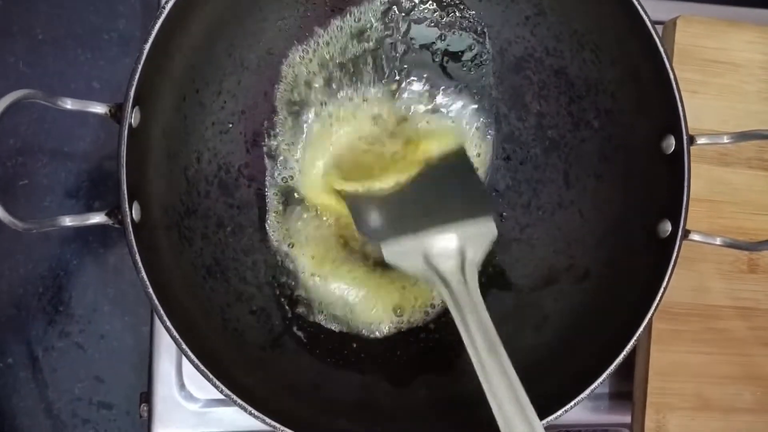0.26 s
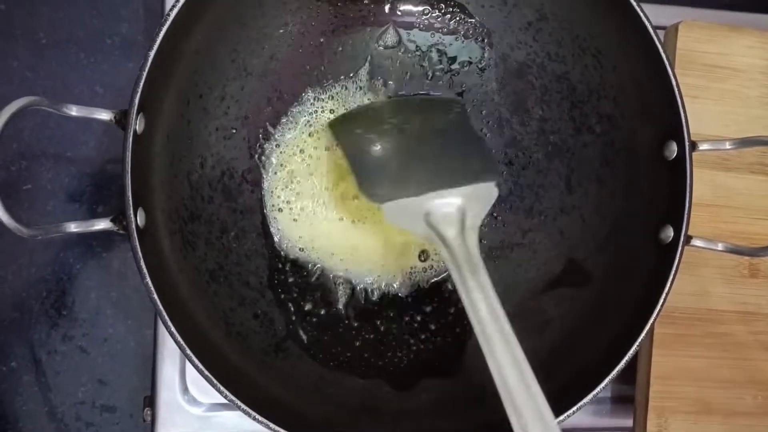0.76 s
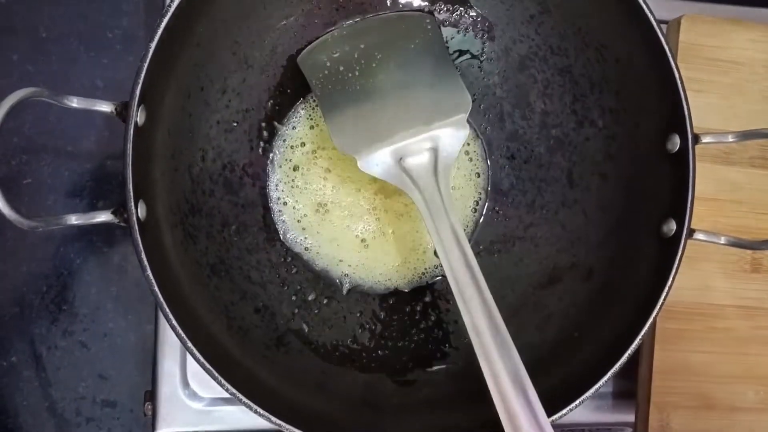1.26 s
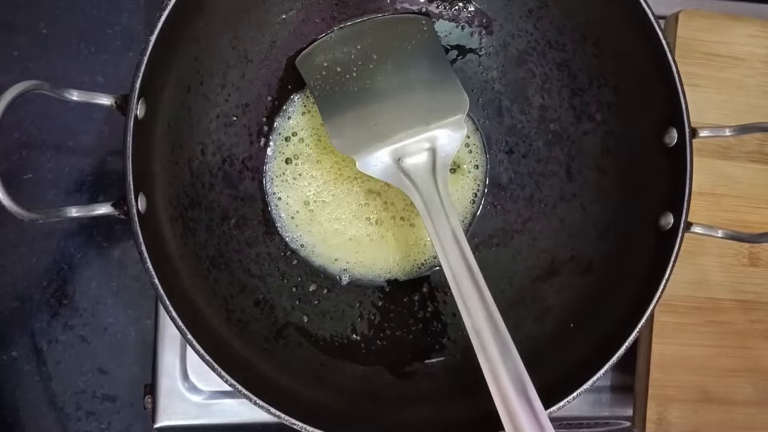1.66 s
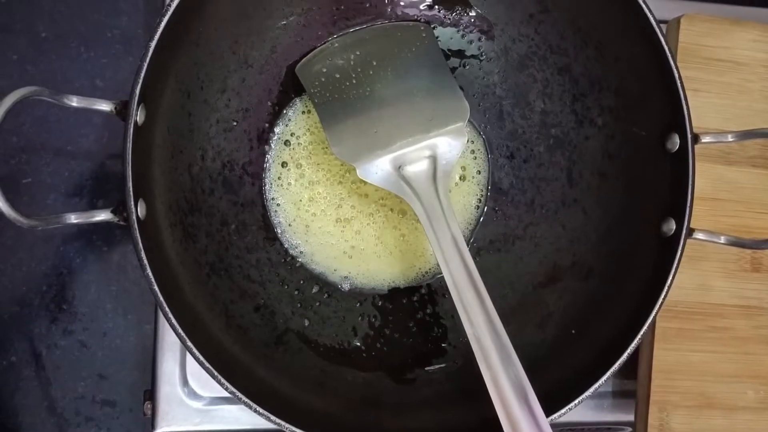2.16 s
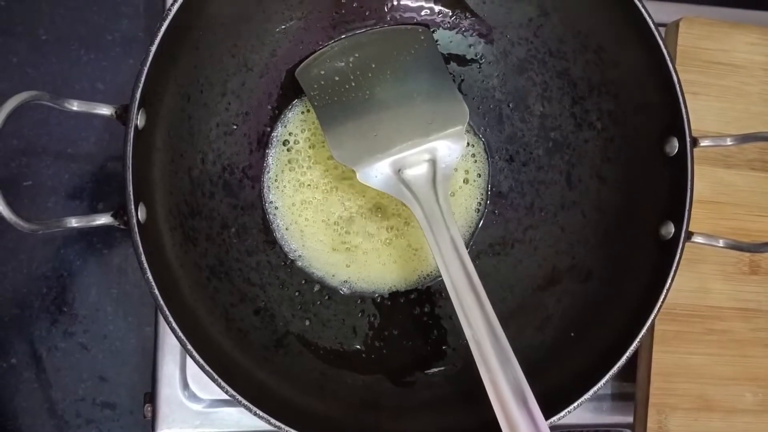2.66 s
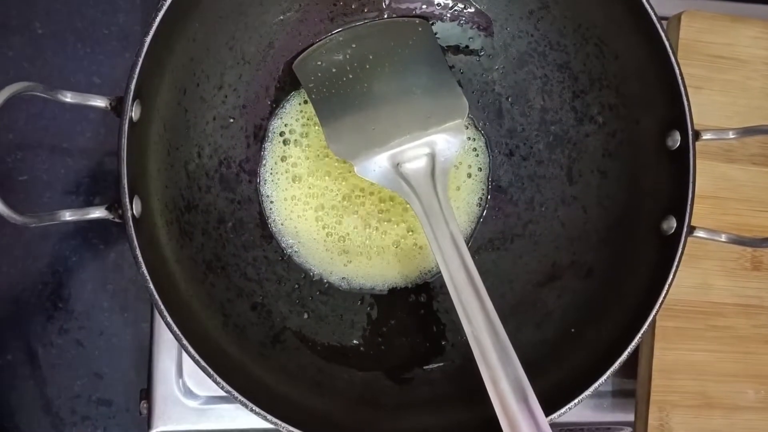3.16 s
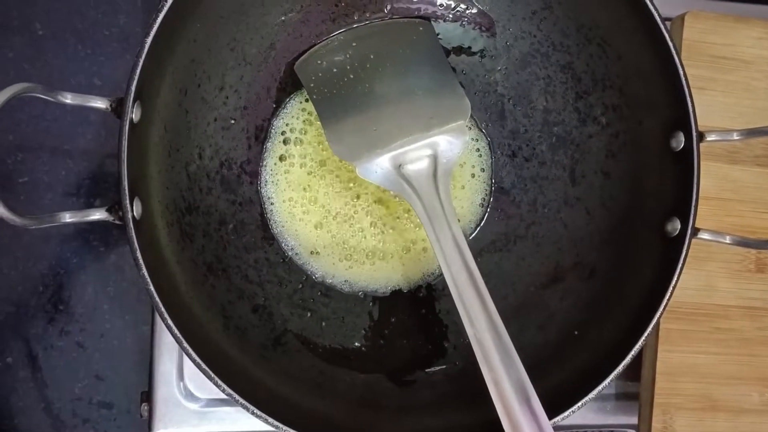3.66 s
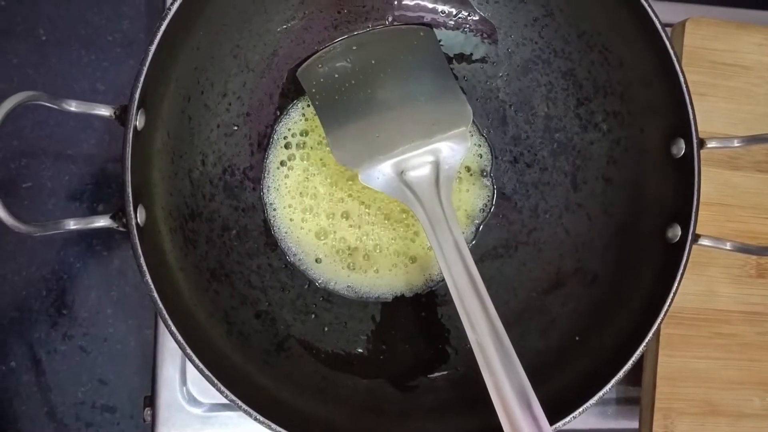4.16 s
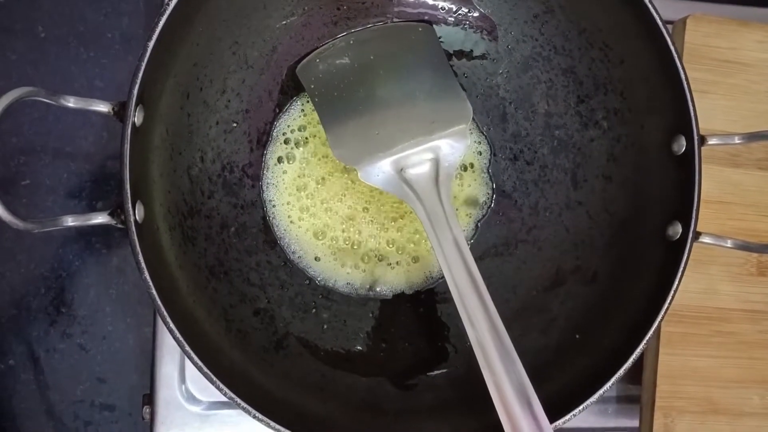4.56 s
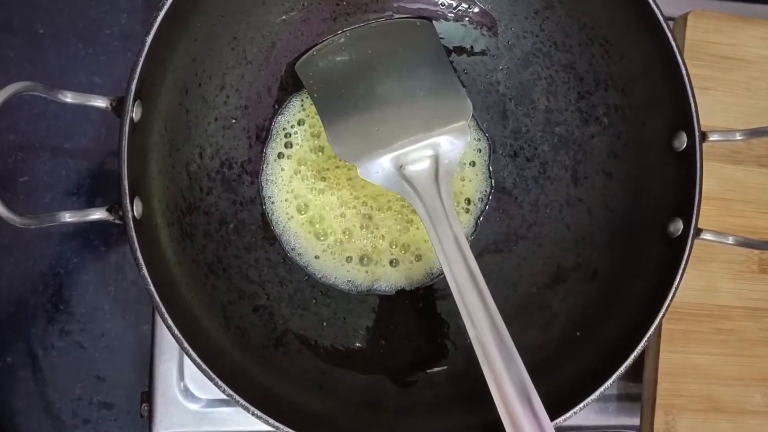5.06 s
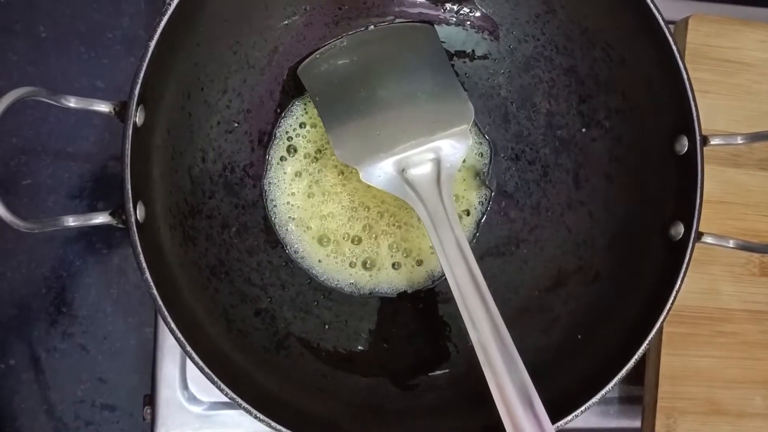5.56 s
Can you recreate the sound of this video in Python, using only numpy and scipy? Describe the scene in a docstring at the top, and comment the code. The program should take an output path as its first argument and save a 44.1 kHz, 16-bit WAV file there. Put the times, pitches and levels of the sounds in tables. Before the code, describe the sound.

Hot fat in a steel wok crackles with dense, bright, ringing pops over a faint sizzle, with a few gritty metal spatula knocks early on.

```python
"""Seeds pop in foaming hot fat in a steel wok, heard from close above at two microphone ports in a hard kitchen.
Each pop is a few ringing cycles with a bright noise snap; the biggest throw puffs of air, pressure jumps
that overload the ports. Early on a steel spatula knocks: gritty chatter rings damped steel modes.
Sizzle and burner rumble are coloured noise, and noise echoes let the kitchen answer pops and knocks."""
import sys
import numpy as np
from scipy import signal
from scipy.fft import rfft, irfft
from scipy.io import wavfile

SR = 44100
rng = np.random.default_rng(int(sys.argv[2]) if len(sys.argv) > 2 else 0)


def bounce(signal):
    """Save signal as a 16-bit WAV file at the path given by the first command-line argument."""
    frames = np.transpose(np.atleast_2d(signal))
    limited = np.clip(frames, -1, 1)
    pcm = np.round(limited * 32767).astype(np.int16)
    wavfile.write(sys.argv[1], SR, pcm)


N = 255780

# pitches that the foam and the wok favour: (frequency [Hz], relative spread [1])
HOLLOWS = [(1790, 0.069), (3050, 0.14)]


def amp(db):
    """Turns decibels into a linear gain."""
    return 10 ** (np.asarray(db, float) / 20)


def rms_one(x):
    """Scales a signal to an rms of 1."""
    return x / np.sqrt(np.mean(x ** 2) + 1e-20)


def in_time(rows):
    """Draws each column of a timed table as a curve over the whole scene."""
    s, *columns = np.transpose(rows)
    return [np.interp(np.arange(N) / SR, s, c) for c in columns]


def at_hz(points, hz, column=1):
    """Reads a table column at any frequency, along a logarithmic frequency axis."""
    table = np.array(points)
    return np.interp(np.log(hz), np.log(table[:, 0]), table[:, column])


def band(x, low_hz, high_hz):
    """Passes one band of frequencies."""
    sos = signal.butter(2, [low_hz, min(high_hz, .45 * SR)], "band", fs=SR, output="sos")
    return signal.sosfilt(sos, x)


def resonance(x, hz, width_hz):
    """A single resonant peak, driven by x."""
    r, w = np.exp(-np.pi * width_hz / SR), 2 * np.pi * hz / SR
    return signal.lfilter((1 - r * r) / 2 * np.array([1, 0, -1]), [1, -2 * r * np.cos(w), r * r], x)


def coloured(spectrum, alike):
    """Stereo noise of a given spectrum and left-right likeness; rms 1."""
    mid, side = rng.standard_normal((2, N))
    pair = np.sqrt(1 + alike) * mid + np.sqrt(1 - alike) * side * [[1], [-1]]
    hz = np.maximum(np.arange(N // 2 + 1) * SR / N, 10)
    slope_db = 12 * np.log2(np.minimum(hz / spectrum[0][0], 1))  # falls away below the first point
    return rms_one(irfft(rfft(pair) * amp(at_hz(spectrum, hz) + slope_db), N))


def shaped(envelope, wave):
    """Grains whose energy is that of their envelope, whatever chance put into the wave."""
    grain = envelope * wave
    wanted = np.sum(envelope ** 2, -1, keepdims=True)
    return grain * np.sqrt(wanted / np.sum(grain ** 2, -1, keepdims=True))


def add(out, s, grains):
    """Lays grains (channel, event, sample) into out at the times s."""
    at = np.round(np.asarray(s) * SR).astype(int)[:, None] + np.arange(grains.shape[-1])
    for channel in (0, 1):
        np.add.at(out[channel], np.minimum(at, N - 1), grains[channel])


def pops(s, hz, ring_db, snap_db):
    """A bursting bubble rings a few cycles, at each port a little otherwise; the tearing shell adds a bright snap."""
    ring_cycles = 2.7  # cycles in which a ring falls to 1/e
    right_lag_s = .0001  # the right port lies a little farther from the fat
    ring_left_db = 5  # rings are on average this much louder at the left port
    t = np.arange(400) / SR
    # per port and pop: four chance values, then 400 samples of noise
    chance = rng.standard_normal((len(s), 2, 404)).swapaxes(0, 1)
    detune, phase, other_luck = chance[..., :1], chance[..., 1:2], chance[:1, :, 2:3]
    balance_db = np.array([[.5], [-.5]]) * (ring_left_db + 3 * chance[0, :, 3])

    late = t - np.array([0, right_lag_s])[:, None, None]
    swell = (1 - np.exp(-(t / 0.00032) ** 2)) * np.exp(-t * hz[:, None] / ring_cycles)
    tone = np.sin(2 * np.pi * hz[:, None] * (1 + 0.041 * detune) * late + 0.81 * phase)
    # the other hollow sounds along, usually more faintly, and a little noise roughens the ring
    other_hz = np.where(hz > 2400, HOLLOWS[0][0], HOLLOWS[1][0])[:, None]
    tone += amp(-8 + 4 * other_luck) * np.sin(2 * np.pi * other_hz * late)
    tone += 0.36 * rms_one(band(chance[..., 4:], 1860, 4620))
    rings, cracks, drops = np.zeros((3, 2, N))
    add(rings, s, amp(ring_db + balance_db)[..., None] * shaped(swell, tone))

    # a sharp crack, then spattering droplets, both from the same noise played backwards
    tear = 1 - np.exp(-t / 0.00014)
    noise = chance[..., :3:-1]
    add(cracks, s, amp(snap_db)[:, None] * shaped(tear * np.exp(-t / 0.00026), noise))
    add(drops, s, amp(snap_db - 15.5)[:, None] * shaped(tear * np.exp(-t / 0.0039), noise))
    return rings + band(cracks, 496, 21600) + band(drops, 1720, 21600)


def loud_pops():
    """The loudest bubbles burst one by one, each with its own pitch and its own mix of ring and snap."""
    # single bursts: (time [s], ring pitch [Hz], ring level [dB], snap level [dB])
    bursts = [(0.047, 1590, -11.5, -24), (0.074, 3120, -12.5, -8), (0.089, 3000, -27, -8.5),
              (0.1631, 4570, -31, -2.5), (0.329, 3010, -8.5, -5.5), (0.4607, 2450, 1.5, -15),
              (0.541, 3080, -5.5, -11.5), (0.5558, 2220, -9.5, -9.5), (0.6357, 5280, -8.5, -0.5),
              (0.6425, 3030, -0.5, -12), (0.7315, 3470, -11, -7), (0.7759, 2880, -3.5, -1),
              (0.839, 2420, -11.5, -5), (0.8556, 3200, -4.5, -5.5), (0.9045, 2650, 0.5, -41),
              (0.9629, 1910, -6, 2.5), (1.0177, 3560, -0.5, -10), (1.0647, 2960, -3, -24),
              (1.1122, 3430, -1, -19), (1.1729, 3080, -7.5, -4.5), (1.179, 3140, -7, -9),
              (1.2165, 3110, -5.5, -13), (1.2284, 3170, -27, -5), (1.3378, 1700, -15, -12),
              (1.439, 3000, -7.5, -20), (1.3892, 3090, -7.5, -60), (1.4686, 4700, -7.5, -3.5),
              (1.4915, 1800, -15, -8), (1.5503, 3150, -3, -13), (1.6469, 5100, -8, -0.5),
              (1.742, 2410, -29, 0.5), (1.7877, 2850, -2, -28), (1.8012, 3240, -8, -9.5),
              (1.879, 4880, -6.5, -12.5), (1.9077, 3100, -8.5, -33), (2.0233, 2930, -3.5, -38),
              (2.041, 4200, -11, -3), (2.0962, 1960, -12.5, -28), (2.1162, 1820, -7.5, 7.5),
              (2.169, 1660, -17, 0.5), (2.2445, 3000, -10.5, -23), (2.254, 3140, -7.5, -13),
              (2.327, 1760, -12, -18), (2.3523, 3080, -8.5, -10.5), (2.3773, 1870, -15, -6.5),
              (2.4753, 3080, -9, -32), (2.5413, 3520, -2, -28), (2.5539, 3040, -6.5, 0),
              (2.6428, 3040, -0.5, -6), (2.6739, 2880, -5.5, -57), (2.757, 3100, -3.5, -39),
              (2.792, 3020, -7, -13), (2.8238, 3000, -10, -4), (2.9, 3140, 1, -29),
              (2.9136, 3380, -30, -2.5), (2.945, 3170, -37, -5.5), (2.9843, 3120, -5, -10.5),
              (3.0272, 3000, -11.5, -16), (3.1174, 3250, -31, -2.5), (3.1307, 3080, -7, -15),
              (3.1957, 3120, -5, 9), (3.246, 3150, -8.5, -15), (3.305, 3140, -4, -10.5),
              (3.3529, 3000, -6, -28), (3.3814, 2870, 1, -13), (3.4269, 1770, -20, 8.5),
              (3.501, 1760, -7.5, -8), (3.546, 3080, -7, -8), (3.5587, 3660, -15, -11.5),
              (3.627, 3220, -8, -19), (3.6512, 2960, -1.5, -10), (3.706, 3120, -25, -5.5),
              (3.7353, 2700, -14, -8.5), (3.743, 3060, -13, -18), (3.776, 3040, 1.5, -11),
              (3.7976, 3300, -19, -3.5), (3.8049, 3720, -5, 3), (3.835, 3230, -2.5, -9),
              (3.854, 2440, -36, 6), (3.9808, 3360, -30, 1.5), (3.999, 2880, -6.5, -19),
              (4.0296, 2980, -22, -8), (4.0603, 3000, -5.5, 4.5), (4.16, 3150, -13.5, -15.5),
              (4.2592, 1700, -20.5, -16), (4.2856, 3300, -30, -1), (4.3398, 2970, -18, -16),
              (4.4012, 1840, -12.5, -8), (4.4262, 1660, -18.5, -14), (4.4457, 3050, -15, -9.5),
              (4.4573, 1750, -14.5, -12), (4.525, 4660, -32, -2.5), (4.5481, 2780, -25, 4.5),
              (4.5664, 2840, -13, -4), (4.6403, 2480, -22, -3.5), (4.682, 1740, -17, -20),
              (4.7135, 3030, -24, -13.5), (4.7799, 3100, -11, -8), (4.7837, 2960, -31, 2),
              (4.8462, 2560, -14.5, -11.5), (4.9321, 3040, -19, -7.5), (4.992, 3120, -14, -8),
              (4.9966, 2750, -3, -13.5), (5.096, 2880, -15, -10), (5.103, 1840, -15, -4),
              (5.1363, 1790, -19, -3.5), (5.2202, 3240, -19, -5), (5.264, 2670, -7, -57),
              (5.278, 3260, -10.5, -5), (5.3537, 2180, -19, 0.5), (5.359, 3400, -9, -7),
              (5.5698, 1450, -38, -3), (5.6849, 3020, -9, -1), (5.7201, 5600, -18, 1),
              (5.7473, 2330, -44, -4.5)]
    return pops(*np.transpose(bursts))


def small_pops(level_db):
    """The many fainter pops come at random, most near the pitch of one hollow or the other."""
    pops_per_s = 150
    count = int(pops_per_s * N / SR)
    share, luck = rng.random((count, 3)), rng.standard_normal((count, 2))
    s = share[:, 0] * N / SR
    hollow = np.array(HOLLOWS)[(share[:, 1] > .45).astype(int)]
    hz = hollow[:, 0] * (1 + hollow[:, 1] * luck[:, 0])
    # many weak and few strong ones, with a ceiling
    size_db = level_db[(s * SR).astype(int)] - 4.49 * np.log(np.maximum(share[:, 2], .15))
    return pops(s, hz, size_db, size_db + 0.13 + 6 * luck[:, 1])


def puffs():
    """The pressure at a port jumps within about a millisecond and ebbs away; the air behind the ports rings."""
    # air thrown at the ports: (time [s], left push [signed pressure], right push [signed pressure],
    # fading to 1/e [s])
    gusts = [(0.163, 0.24, -0.042, 0.00052), (0.3295, -0.23, -0.3, 0.0011), (0.9627, 1, 2.7, 0.00017),
             (1.227, 0.12, 0.079, 0.0013), (2.116, 1.5, -0.041, 0.018), (3.1945, -0.97, -0.24, 0.0039),
             (3.1945, 0.5, -0.24, 0.00043), (3.422, -0.06, 0.5, 0.0012), (3.4266, 3.5, 0.11, 0.0033),
             (3.7349, 0.5, -0.082, 0.00043), (3.853, 1.4, -0.36, 0.00072), (3.98, -2, -0.079, 0.015),
             (4.058, 0.24, -0.004, 0.00099), (4.5255, 0.44, 0.058, 0.00042), (4.548, -0.8, -0.18, 0.0008),
             (4.639, 0.2, -0.38, 0.00051), (5.565, 0.44, 0.1, 0.0026), (5.5697, -2, -1.57, 0.0072),
             (5.6865, -0.82, 1.88, 0.017)]
    cavity_hz, cavity_width_hz, cavity_db = 278, 53, -9
    t, out = np.arange(int(.12 * SR)) / SR, np.zeros((2, N))
    s, left, right, fading = np.transpose(gusts)
    shape = (1 - np.exp(-(t / 0.00036) ** 2)) * np.exp(-t / fading[:, None])
    add(out, s, np.array([left, right])[..., None] * shape)
    return out + amp(cavity_db) * resonance(out + 1e-18, cavity_hz, cavity_width_hz)


def spatula():
    """Each contact is a short gritty chatter that sets the damped steel ringing, one mode most of all."""
    # contacts with the wok: (time [s], chatter level [dB], fading of the contact to 1/e [s],
    # mode that rings out [Hz], extra level of the thud [dB])
    knocks = [(0.009, -37.5, 0.02, 1990, 0.5), (0.317, -29.5, 0.011, 3020, 2.5),
              (0.765, -25.5, 0.012, 13750, -7.5), (1.08, -21.5, 0.023, 14765, 0.5),
              (1.275, -28, 0.038, 3738, -11.5)]
    # modes of spatula and wok: (frequency [Hz], relative level [dB], decay by 60 dB [s])
    steel = [(344, 14, .05), (540, -2, .1), (680, -3, .12), (988, 2, .11), (1152, 0, .09), (1330, -4, .1),
             (1990, -9, .08), (3020, -9, .08), (3738, -11, .1), (5115, -14, .1), (7875, -17, .2),
             (13310, -15, .05), (13750, -19, .07), (14765, -15, .04)]
    favour_db = 13  # how far the favoured mode stands out
    t, out = np.arange(int(.15 * SR)) / SR, np.zeros((2, N))
    s, level_db, length, favoured_hz, thud_db = np.transpose(knocks)
    press = amp(level_db)[:, None] * (1 - np.exp(-t / 0.0022)) * np.exp(-t / length[:, None])
    chatter = shaped(press, rng.laplace(size=(len(s), len(t))))  # uneven, gritty slips
    modes_hz = np.array(steel)[:, 0]
    nearest_hz = modes_hz[np.abs(favoured_hz[:, None] - modes_hz).argmin(axis=1)]

    for hz, mode_db, t60 in steel:
        r, w = amp(-60 / (t60 * SR)), 2 * np.pi * hz / SR
        extra_db = favour_db * (nearest_hz == hz) + thud_db * (hz < 400)  # the lowest mode is the thud
        uneven_db = rng.normal(0, 2, (2, len(s), 1))
        force = np.full((2, N), 1e-18)
        add(force, s, chatter * amp(mode_db - 30.5 + extra_db[:, None] + uneven_db))
        out += signal.lfilter([0, np.sin(w)], [1, -2 * r * np.cos(w), r * r], force)

    # the contact itself: a body alike at both ports, and grit with random signs that is not
    body, grit = np.zeros((2, 2, N))
    add(body, s, np.array([chatter, chatter]))
    add(grit, s, chatter * rng.choice([-1, 1], (2, 1, len(t))))
    return out + amp(13.0) * band(body, 410, 3700) + amp(10) * band(grit, 780, 16000)


def sizzle(level_db):
    """The foaming fat hisses: noise strongest near 3 kHz, almost unrelated between the ports."""
    # colour of the hiss: (frequency [Hz], relative density [dB per Hz])
    hiss = [(500, 0), (900, 9), (1750, 5), (2200, 1), (3120, 30.5), (4000, 9), (7000, -20), (15000, -13)]
    return amp(level_db) * coloured(hiss, alike=0.04)


def burner(level_db):
    """The flame rumbles: low noise, nearly the same at both ports."""
    # colour of the rumble: (frequency [Hz], relative density [dB per Hz])
    rumble = [(35, -8), (55, 4.5), (75, 6.5), (110, 2.5), (230, -8.5), (700, -16), (1200, -31.5)]
    return amp(level_db) * coloured(rumble, alike=0.96)


def kitchen(x):
    """No wall is near: echoes swell after a short lull, then die band by band, by four unrelated paths."""
    # echoes of the room: (frequency [Hz], decay by 60 dB [s], relative level [dB])
    room = [(303, 1, -12), (1070, 0.13, -11), (2450, 0.32, -8), (6030, 0.51, -11.5), (13400, 0.21, -9)]
    first_wall_s, swell_s = 0.0041, 0.019
    bowl_db = -1.5  # early answer of the bowl of the wok below 4 kHz, against the swollen echoes
    echo_s, echo_db = 0.01836, -17  # one hard surface answers on its own
    t, echoes = np.arange(int(.6 * SR)) / SR, 0
    walls = np.clip((t - first_wall_s) / swell_s, 0, 1)
    bowl = amp(bowl_db) * np.clip((t - .003) / 0.000073, 0, 1)

    for low in 250 * 2 ** np.arange(0, 6.5):  # octave bands
        centre = np.sqrt(2) * low
        noise = band(rng.standard_normal((2, 2, len(t))), low, 2 * low)
        dying = noise * amp(-60 * t / at_hz(room, centre))
        energy = np.sum(dying ** 2) / np.mean(noise ** 2) / 2
        start = np.maximum(walls, bowl) if centre < 4000 else walls
        echoes = echoes + amp(at_hz(room, centre, column=2)) * start * dying / np.sqrt(energy)

    smear = np.exp(-np.abs(t - echo_s) / .004)
    lone = shaped(smear / np.sqrt(np.sum(smear ** 2)), rng.standard_normal((2, 2, len(t))))
    echoes = echoes + amp(echo_db) * band(lone, 1160, 8900)
    return signal.fftconvolve(x[None], echoes, axes=2).sum(1)[:, :N]


def scene():
    """Pops and knocks leave the wok and wake the kitchen; sizzle, burner and puffs reach the ports directly."""
    # how the stove goes: (time [s], small pops [dB], sizzle [dB], burner [dB])
    frying = [(0, -38, -41.5, -44), (.4, -39.5, -47.5, -48), (1.2, -30.5, -39, -48.5), (1.9, -35, -56, -47),
              (2.4, -31.5, -47, -47), (3.3, -32, -55.5, -46), (3.9, -34, -46, -51.5),
              (4.5, -35, -52, -48.5), (5.3, -33.5, -50, -48), (5.5, -40.5, -48.5, -47.5),
              (5.8, -43, -60, -52)]
    small_db, sizzle_db, burner_db = in_time(frying)
    wok = loud_pops() + small_pops(small_db) + spatula()
    return wok + puffs() + sizzle(sizzle_db) + burner(burner_db) + amp(3.0) * kitchen(wok)


def record(dry):
    """Lows are cut, each port colours the treble its own way, peaks clip, the top is cut."""
    # treble colour of the ports: (frequency [Hz], width [Hz], left gain [dB], right gain [dB])
    ports = [(8820, 2900, -8, -13), (11340, 1140, -22, -37), (13070, 1530, -2.5, 8)]
    low_cut_hz, top_cut_hz = 47, 16700
    low_cut = signal.butter(2, low_cut_hz, "high", fs=SR, output="sos")
    out = signal.sosfilt(np.tile(low_cut, (2, 1)), dry)  # two equal stages
    for hz, width_hz, *gains_db in ports:
        out = out + (amp(gains_db)[:, None] - 1) * resonance(out, hz, width_hz)
    overloaded = np.clip(out, -.9, .9)
    return signal.sosfilt(signal.cheby2(20, 75, top_cut_hz, fs=SR, output="sos"), overloaded)


dry = scene()
out = record(dry)
bounce(out)
```